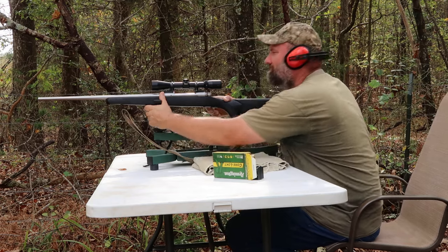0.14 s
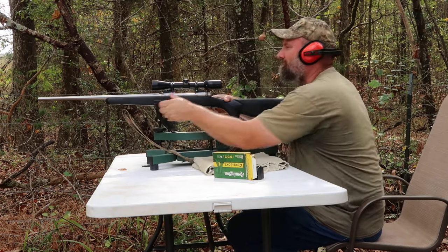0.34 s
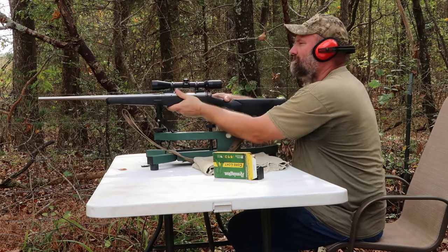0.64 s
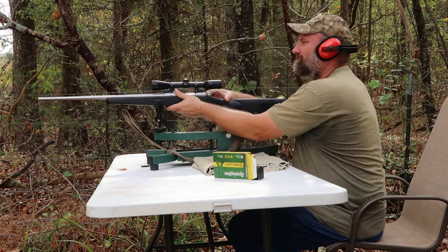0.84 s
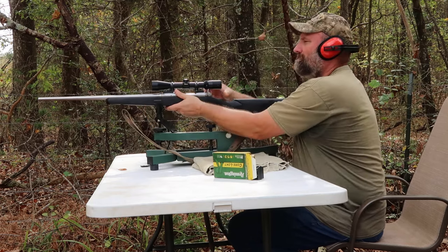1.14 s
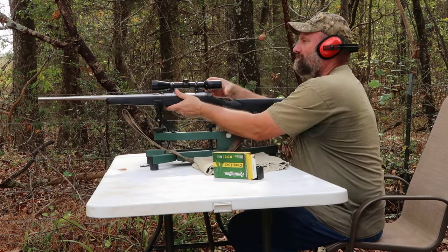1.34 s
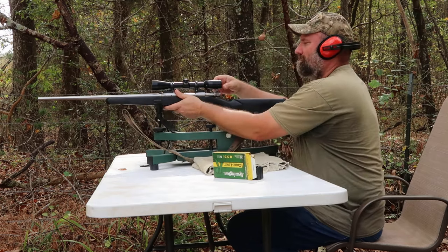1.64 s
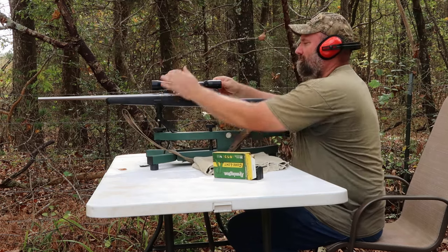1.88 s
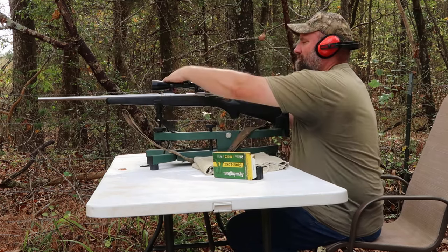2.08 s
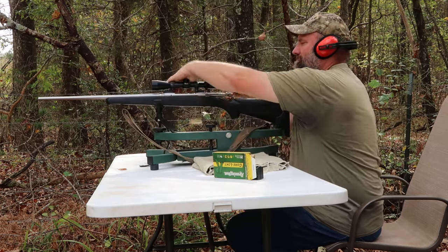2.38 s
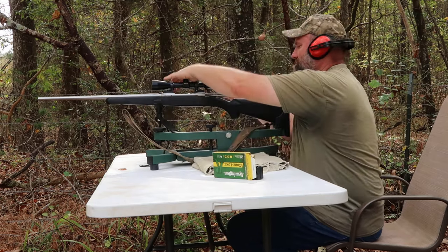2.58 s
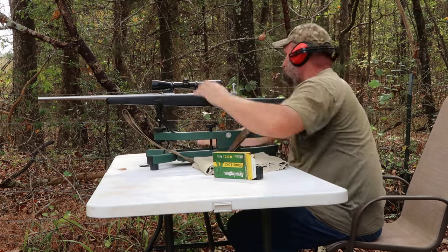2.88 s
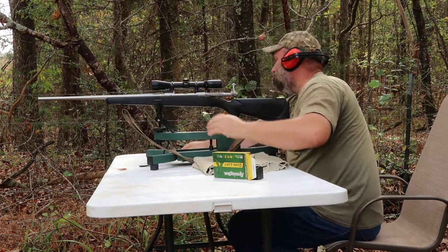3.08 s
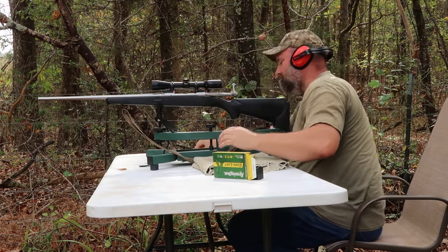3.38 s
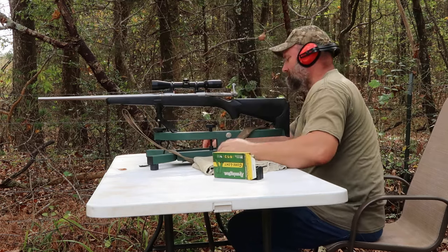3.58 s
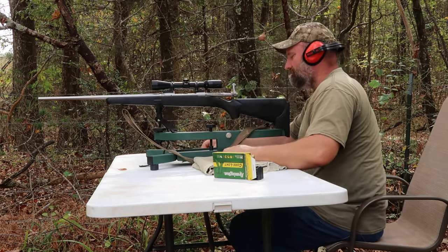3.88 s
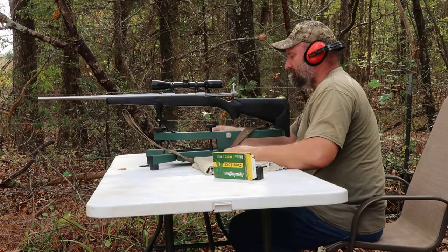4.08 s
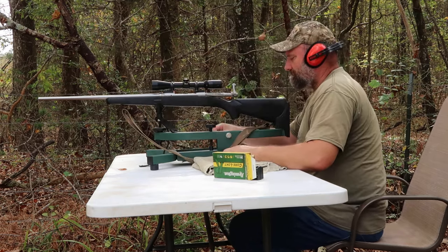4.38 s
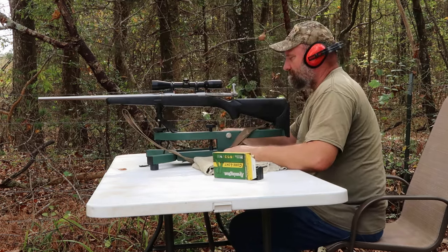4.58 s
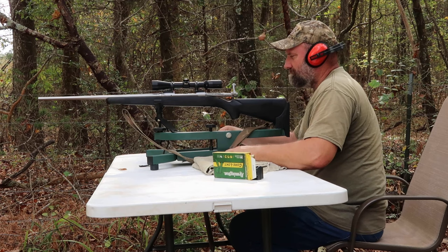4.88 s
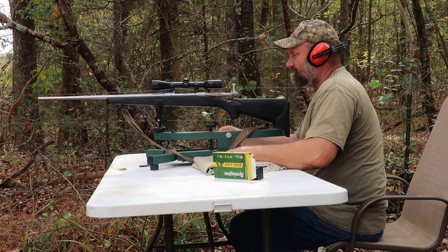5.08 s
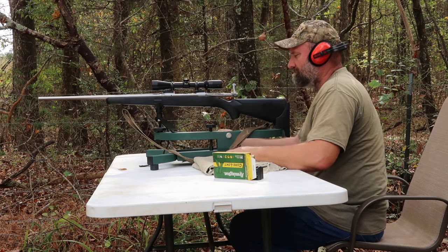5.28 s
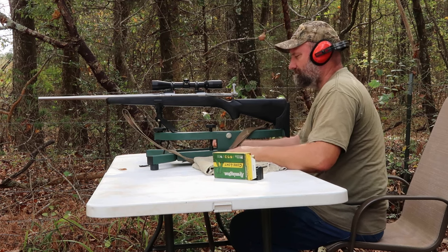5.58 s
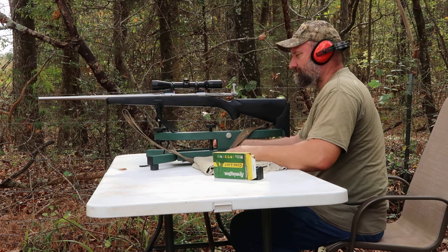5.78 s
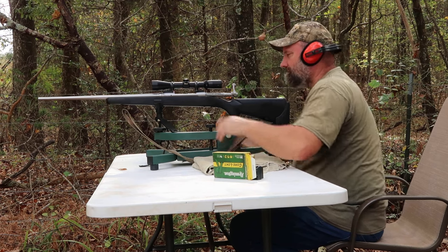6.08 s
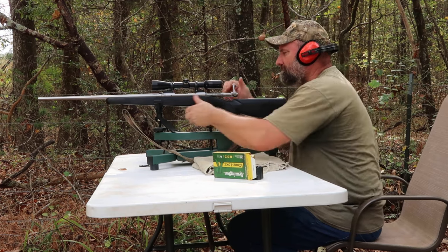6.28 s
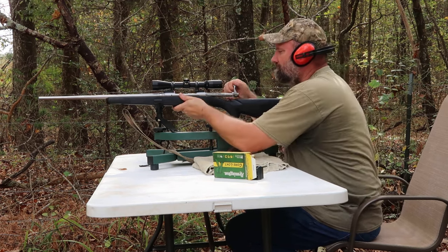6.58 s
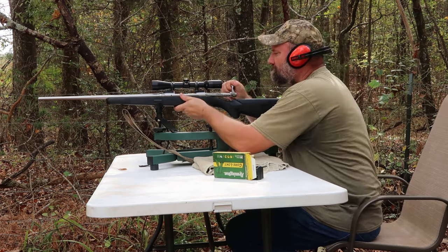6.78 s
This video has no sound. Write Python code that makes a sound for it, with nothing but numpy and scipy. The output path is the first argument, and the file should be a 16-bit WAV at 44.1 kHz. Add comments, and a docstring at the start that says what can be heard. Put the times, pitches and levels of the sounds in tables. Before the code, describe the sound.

Sharp metallic bolt clacks, a hollow double knock and scuffing of a gunstock, then a small brass clatter on plastic, over softly rushing leaves.

```python
"""A rifle bolt is lifted and drawn back at a plastic shooting table in quiet woods, freeing a brass case.
The stock clacks down into a steel rest, rocks and slides; the case drops on the table; the bolt is touched again.
Blows are noise cracks plus decaying modes; rubbing is uneven noise in strokes.
The trees scatter every sound back, over a soft rush of leaves in shaped noise."""
import sys
import numpy as np
from scipy import signal
from scipy.fft import rfft, irfft, next_fast_len
from scipy.io import wavfile
from scipy.ndimage import map_coordinates

SR = 44100
rng = np.random.default_rng(int(sys.argv[2]) if len(sys.argv) > 2 else 0)


def transcribe(signal):
    """Save signal, clipped to [-1, 1], as a 16-bit WAV file at the path in sys.argv[1]."""
    frames = np.atleast_2d(signal).T
    limited = np.clip(frames, -1, 1)
    pcm = np.round(limited * 32767).astype(np.int16)
    wavfile.write(sys.argv[1], SR, pcm)


N = 305777  # samples
RING_TIME_S = np.arange(SR // 4) / SR

# Bolt clicks. Each row: start in seconds, strength in dB, hardness in dB (tilts towards treble),
# note of the struck part in Hz, lift of that note in dB.
BOLT_CLICKS = [(0.786, -40.5, -8.5, 1490, 12), (1.206, -41.5, 4, 2140, 2), (1.218, -43.5, 9, 2410, 0),
               (1.2285, -32, -6, 1170, 14), (1.234, -26.5, 6, 1910, 12.5), (1.330, -48, -26, 1400, 2),
               (1.414, -52, 1, 3100, 4), (1.434, -43, -10, 1830, 7), (1.565, -50, -8, 1720, 9),
               (1.594, -46.5, -11, 1520, 11), (1.691, -51.5, -20, 3470, 9), (2.114, -52, -9, 876, 18),
               (2.124, -46.5, -3, 2480, 18), (2.135, -46.5, -14, 870, 19), (2.1475, -32.5, 7, 2400, 11.5),
               (2.153, -37.5, 8.5, 860, 20), (2.2555, -38.5, 14, 2270, 24.5), (2.297, -46, -3, 2350, 8),
               (2.468, -40, 6, 2200, 15), (2.5025, -38, 5.5, 3900, 3), (2.514, -38.5, 5, 3230, -1),
               (2.535, -30.5, 9.5, 7400, -1), (3.633, -50.5, 1, 3030, 3), (6.550, -51, 11, 4500, -3),
               (6.852, -41.5, 11, 5000, 20), (6.925, -41.5, -6, 2180, 8)]
# Modes of the steel action. Each row: frequency in Hz, relative level in dB, t60 in seconds.
ACTION_MODES = [(444.6, -1, 0.13), (1130, -8, 0.05), (1920, 6, 0.05), (2250, 4, 0.09), (3400, -7, 0.045)]
# Crack colour of the steel action. Each row: frequency in Hz, relative level in dB.
STEEL_TONE = [(60, -27), (220, -7), (450, 4.5), (1200, 10.5), (3000, 12), (5000, 1), (8500, -7.5),
              (12000, -12), (16000, -28)]
# Short strokes of the bolt in its raceway. Each row: start in seconds, length in seconds, level in dB.
BOLT_DRAWS = [(1.264, 0.024, -56), (1.322, 0.022, -57), (1.416, 0.034, -51), (2.114, 0.029, -58),
              (2.143, 0.034, -48), (2.215, 0.012, -56)]

# Stock knocking on the rest. Each row: start in seconds, strength in dB, weight behind it in dB (adds thump),
# note of the struck part in Hz, lift of that note in dB.
STOCK_KNOCKS = [(2.5335, -20.5, -1.5, 780, 7), (2.536, -23, -6, 2750, 14), (2.5485, -17.5, -5.5, 1470, 7),
                (2.551, -27.5, -3, 790, 18), (2.562, -36, 7.5, 417, 17), (2.746, -28.5, 0.5, 580, 11),
                (2.754, -41, 10, 290, 13), (2.766, -23, -18, 1630, 4.5), (2.806, -33.5, -6, 2120, 13),
                (2.876, -34.5, 1, 450, 28), (2.8975, -29, -2, 440, 19), (2.91, -34.5, -8, 433, 18),
                (2.949, -42.5, 8.5, 457, 26), (2.963, -33, -9, 440, 27), (3.068, -43, 11.5, 180, 24),
                (3.078, -42, -16, 420, 12), (3.209, -50, -1, 660, 8)]
# Modes of the hollow rest. Each row: frequency in Hz, relative level in dB, t60 in seconds.
REST_MODES = [(282, -5.5, 0.22), (325, -12, 0.12), (412, -9, 0.12), (462, 7.5, 0.065), (517, -17, 0.11),
              (703, -15, 0.11), (817, -1, 0.083), (863, 0, 0.066), (1526, -4, 0.062), (1800, -19, 0.075),
              (1930, -20, 0.095), (2360, 1, 0.049)]
# Crack colour of the rest. Each row: frequency in Hz, relative level in dB.
REST_TONE = [(45, -55), (65, -36), (100, -11), (210, 2), (400, 4.5), (800, 5), (1200, -0.5), (3000, -3),
             (4500, -11.5), (8000, -17), (15000, -29)]
# Stock's weight reaching the table top through the rest. Each row: start in seconds, level in dB.
TABLE_THUMPS = [(1.234, -53), (1.325, -53), (2.548, -26), (2.747, -32.5)]
# Low modes of the table top. Each row: frequency in Hz, relative level in dB, t60 in seconds.
BOARD_MODES = [(291, 6, 0.091), (317, -5.5, 0.16), (413, 1.5, 0.085), (517, -1, 0.18), (677, -8, 0.18)]
# Shoves of the stock in its cradle. Each row: start in seconds, length in seconds, groan in dB, scuff in dB.
STOCK_SHOVES = [(2.88, 0.12, -42, -49), (3.017, 0.11, -44.5, -52), (3.179, 0.17, -47.5, -52),
                (3.342, 0.042, -54, -53), (3.468, 0.025, -46.5, -45)]
# Cradle resonances. Each row: frequency in Hz, width in Hz (before squaring), relative level in dB.
CRADLE_RESONANCES = [(441, 170, 5), (830, 460, -3.5)]
# Scuff colour. Each row: frequency in Hz, relative level in dB.
SCUFF_TONE = [(150, -37), (900, -5), (1500, 6.5), (3200, 1), (5000, -10.5), (10000, -26.5)]

# Case bouncing on its rim (hard) or side. Each row: start in seconds, strength in dB, hardness in dB.
CASE_BOUNCES = [(4.558, -30.5, -6), (4.562, -29, 0), (4.571, -21.5, 2.5), (4.578, -29, -0.5),
                (4.591, -36.5, -7), (4.603, -52, 1), (4.621, -40, -6), (4.644, -39.5, -6)]
# Modes of the table under the case. Each row: frequency in Hz, relative level in dB, t60 in seconds.
TABLE_MODES = [(960, 2, .07), (1335, -7, .17), (1766, -5, .06), (2412, 1, .07), (2690, -1, .08),
               (2985, 0, .1), (3142, -3, .12), (3707, -4, .11), (5771, -9, .12), (6939, -11, .09)]
# Crack colour of the table. Each row: frequency in Hz, relative level in dB.
TABLE_TONE = [(60, -51), (250, -10.5), (700, -13), (1000, 2), (1900, 3), (3000, 10), (4600, -3.5),
              (7500, -6.5), (15000, -28)]
# Thin brass wall set ringing. Each row: start in seconds, note in Hz, note level in dB, overtone level in dB.
BRASS_PINGS = [(2.146, 10230, -39.5, -46), (2.257, 9780, -48.5, -65), (2.297, 9830, -52, -70),
               (2.536, 10060, -44, -62), (2.769, 9930, -51.5, -64), (2.901, 9850, -55, -67),
               (4.557, 9700, -40, -50), (4.57, 9840, -31.5, -56), (4.617, 9760, -41, -71),
               (4.678, 9860, -56, -80)]

# Sleeve brushing as the arm moves. Each row: start in seconds, length in seconds, level in dB.
SLEEVE_RUSTLES = [(0.425, 0.31, -65), (6.285, 0.03, -55.5), (6.44, 0.2, -60), (6.738, 0.21, -58.5)]
# Cloth colour. Each row: frequency in Hz, relative level in dB.
CLOTH_TONE = [(150, -9), (500, 4.5), (1400, -3.5), (3200, -3), (8000, -15), (15000, -29)]

# Decay of the trunks' echo. Each row: frequency in Hz, t60 in seconds.
WOODS_T60 = [(150, 0.75), (600, 0.98), (2500, 0.57), (6000, 0.51), (13000, 0.19)]
# Colour of what the trunks send back. Each row: frequency in Hz, relative level in dB.
TRUNK_TONE = [(100, -3), (400, -21), (2000, -1), (5000, -1.5), (14000, 10.5)]
# Colour of the distant leaves. Each row: frequency in Hz, relative level in dB.
LEAVES_TONE = [(20, -12), (77, -8.5), (262, -1), (410, 0.5), (660, -1), (1370, -6), (2670, -7.5),
               (6000, -16), (10800, -23.5), (13000, -31.5), (15500, -43)]
# Gain of the side signal for handling, straight ahead. Each row: frequency in Hz, gain in dB.
HANDLING_WIDTH = [(100, -48), (400, -72), (1400, -77), (2800, -26), (5500, -13), (11000, 1)]
# Gain of the side signal for the echoes. Each row: frequency in Hz, gain in dB.
ECHO_WIDTH = [(100, -29), (300, -58), (700, -59), (1400, -41), (2800, -13.5), (5500, 0.5)]
# Gain of the side signal for the leaves, from all around. Each row: frequency in Hz, gain in dB.
LEAVES_WIDTH = [(60, -21), (200, -33), (700, -19), (1300, -8.5), (2400, -7), (5000, 2)]

DRAW_ATTACK_S, DRAW_T60_S = 0.0037, 0.065
SHOVE_ATTACK_SHARE, SHOVE_T60_S = 0.6, 0.2  # attack as a share of the shove's length
SLIP_KNOTS_PER_S, SLIP_UNEVEN_DB, GRIT_DB = 70, 3.5, 1.5  # dB per unit of random curve
OVERTONE_HZ = 14720  # second mode of the brass wall, before detuning
SLACK_S, RATTLE_DB, RATTLE_SPREAD_DB = .006, -4, 1.5  # mean wait, change per touch, scatter
AIR_DB, AIR_START_DB, AIR_SETTLE_S = -56, -2.5, 0.89  # settled level, initial offset, time constant
TOP_HZ = 15750


def amp(db):
    """Decibels to gain."""
    return 10 ** (np.asarray(db) / 20)


def unit(x):
    """Scale to rms 1."""
    return x / np.sqrt(np.mean(x ** 2) + 1e-20)


def along(points, hz):
    """Interpolate (Hz, value) points on a log axis."""
    point_hz, value = np.transpose(points)
    return np.interp(np.log(hz + 1), np.log(point_hz + 1), value)


def wobble(knots_per_s):
    """Smooth random curve through normal knots."""
    knots = rng.standard_normal(int(N * knots_per_s / SR) + 4)
    return map_coordinates(knots, [np.arange(N) * knots_per_s / SR])


def filtered(x, response):
    """Apply a response of frequency, zero-padded."""
    n = x.shape[-1]
    m = next_fast_len(n + 8192)
    return irfft(rfft(x, m) * response(np.fft.rfftfreq(m, 1 / SR)), m)[..., :n]


def toned(x, tone):
    """Apply a (Hz, dB) colour."""
    return filtered(x, lambda hz: amp(along(tone, hz)))


def noise(tone, size):
    """Coloured noise of rms 1."""
    return unit(toned(rng.standard_normal(size), tone))


def add(track, start_s, sound):
    """Mix a sound into the track, cut at its end."""
    part = track[..., round(start_s * SR):][..., :sound.shape[-1]]
    part += sound[..., :part.shape[-1]]


def stereo(pair, width):
    """Mid and side to left and right; width sets the side gain by frequency."""
    side = toned(pair[1], width)
    return np.array([pair[0] + side, pair[0] - side])


def resonance(f, hz, width_hz):
    """Causal response of one damped mode, 1 at its centre."""
    return 1j * f * width_hz / (hz * hz - f * f + 1j * f * width_hz)


def ring(modes, scatter_db, detune):
    """Decaying modes, mid and side; strengths and pitches vary from blow to blow."""
    hz, db, t60_s = np.transpose(modes)[:, :, None]
    hz = hz * (1 + detune * rng.standard_normal(hz.shape))
    strength = amp(db.T + scatter_db * rng.standard_normal((2, len(modes))))
    strength = strength * rng.choice([-1, 1], len(modes))
    swing = np.exp((2j * np.pi * hz - np.log(1000) / t60_s) * RING_TIME_S)
    return np.array([strength[0] @ swing.imag, strength[1] @ swing.real])


def contacts(rows, modes, tone, ring_db, rise_s, hold_s, t60s_s, balance_db, touch_slopes, detune,
             part_width=.1):
    """Blows: a dense crack, held while the faces grind, plus body modes; touch (hardness or weight) tilts bands."""
    track, t = np.zeros((2, N)), RING_TIME_S
    edges = [((105, 900), "band"), ((900, 4500), "band"), (4500, "high")]  # low, middle, high in Hz
    bands = [signal.butter(3, edge, kind, fs=SR, output="sos") for edge, kind in edges]
    onset = 1 - np.exp(-t / rise_s)
    for start_s, strength_db, touch_db, *part in rows:
        dense = noise(tone, size=(2, len(t)))
        modal = amp(ring_db) * ring(modes, scatter_db=2.5, detune=detune)
        if part:  # the struck part's note colours the crack
            hz, lift_db = part
            dense = unit(filtered(dense, lambda f: 1 + amp(lift_db) * resonance(f, hz, part_width * hz)))
        for band, band_db, slope, t60_s in zip(bands, balance_db, touch_slopes, t60s_s):
            crack = dense * amp(-60 * np.maximum(t - hold_s, 0) / t60_s)
            blow = signal.sosfilt(band, (crack + modal) * onset)
            blow = blow / np.std(blow[0, :SR // 100])  # level set on the first 10 ms of mid
            add(track, start_s, amp(strength_db + band_db + slope * touch_db) * blow)
    return track


def stroke(start_s, length_s, attack_s, t60_s):
    """Gain of one rubbing stroke: attack, hold, release."""
    t = np.arange(N) / SR - start_s
    return np.clip(t / attack_s, 0, 1) * amp(-60 * np.clip((t - length_s) / t60_s, 0, 2))


def slips(knots_per_s, uneven_db):
    """Friction: noise that catches and lets go."""
    return rng.standard_normal((2, N)) * amp(uneven_db * wobble(knots_per_s))


def bolt():
    """Lugs, cam and bolt stop click in the steel action; hardness adds treble and cuts bass."""
    return contacts(BOLT_CLICKS, ACTION_MODES, STEEL_TONE, ring_db=-25, rise_s=0.00088, hold_s=0.0037,
                    t60s_s=[.032, .016, .014], balance_db=[-9, 0, -8.5], touch_slopes=[-0.34, 0, 0.8],
                    detune=0.016, part_width=0.085)


def scrape():
    """Steel grates on steel between the clicks: steel-coloured noise in short strokes."""
    gain = sum(amp(db) * stroke(start_s, length_s, DRAW_ATTACK_S, DRAW_T60_S)
               for start_s, length_s, db in BOLT_DRAWS)
    return gain * unit(toned(slips(knots_per_s=200, uneven_db=0.0), STEEL_TONE))


def rest():
    """The stock lands in the hollow rest and rocks; weight mostly adds bass."""
    return contacts(STOCK_KNOCKS, REST_MODES, REST_TONE, ring_db=-12.5, rise_s=0.00074, hold_s=0.004,
                    t60s_s=[.065, .042, .028], balance_db=[-1, -0.5, -21], touch_slopes=[0.9, 0, 0.11],
                    detune=0.01, part_width=0.076)


def table_top():
    """Low modes of the table top boom briefly under the stock's weight."""
    track = np.zeros((2, N))
    onset = 1 - np.exp(-RING_TIME_S / 0.0012)
    for start_s, db in TABLE_THUMPS:
        add(track, start_s, amp(db) * ring(BOARD_MODES, scatter_db=1.0, detune=0.0033) * onset)
    return track


def slide():
    """Slips of the stock make the cradle resonances groan, under a dry, gritty scuff."""
    rub = slips(SLIP_KNOTS_PER_S, SLIP_UNEVEN_DB)
    groan = unit(filtered(rub, lambda f: sum(amp(db) * resonance(f, hz, width_hz) ** 2
                                             for hz, width_hz, db in CRADLE_RESONANCES)))
    scuff = unit(toned(rub * amp(GRIT_DB * wobble(420)), SCUFF_TONE))
    track = np.zeros((2, N))
    for start_s, length_s, groan_db, scuff_db in STOCK_SHOVES:
        gain = stroke(start_s, length_s, SHOVE_ATTACK_SHARE * length_s, SHOVE_T60_S)
        track += gain * (amp(groan_db) * groan + amp(scuff_db) * scuff)
    return track


def case_bounces():
    """The empty case clatters on the table; hardness adds treble and cuts bass."""
    return contacts(CASE_BOUNCES, TABLE_MODES, TABLE_TONE, ring_db=-10, rise_s=0.00085, hold_s=0.0016,
                    t60s_s=[.05, .036, .03], balance_db=[-12.5, -1, -9.5], touch_slopes=[-0.81, 0, 1],
                    detune=0.004)


def case_pings():
    """Two modes of the brass wall ring at each ping, then at three weaker touches as the loose case chatters."""
    track = np.zeros((2, N))
    onset = 1 - np.exp(-RING_TIME_S / 0.00045)
    for start_s, hz, note_db, overtone_db in BRASS_PINGS:
        modes = [(hz, note_db, .1), (OVERTONE_HZ, overtone_db, .07)]
        touches_s = start_s + np.cumsum([0, *rng.exponential(SLACK_S, size=3)])
        for k, touch_s in enumerate(touches_s):
            brass = ring(modes, scatter_db=RATTLE_SPREAD_DB, detune=0.0038)
            add(track, touch_s, amp(k * RATTLE_DB) * brass * onset)
    return track


def sleeve():
    """Cloth rustles faintly as the arm moves: uneven friction noise in strokes."""
    gain = sum(amp(db) * stroke(start_s, length_s, attack_s=0.0096, t60_s=0.22)
               for start_s, length_s, db in SLEEVE_RUSTLES)
    return gain * unit(toned(slips(knots_per_s=72, uneven_db=5.0), CLOTH_TONE))


def woods(direct, near_db, near_t60_s, far_db):
    """Table and ground answer after 4 ms; the trunks add a longer tail. Gives mid and side."""
    hz, frame_s, z = signal.stft(rng.standard_normal((2, SR)), SR, nperseg=256)
    tail_db = along(TRUNK_TONE, hz)[:, None] - 60 * frame_s / along(WOODS_T60, hz)[:, None]
    far = signal.istft(z * amp(tail_db), SR, nperseg=256)[1][:, :SR]
    t = np.arange(SR) / SR
    far = far * (1 - np.exp(-t / 0.0059))
    near = rng.standard_normal((2, SR)) * amp(-60 * t / near_t60_s) * (t > .004)
    answer = amp(near_db) * near / np.linalg.norm(near[0]) + amp(far_db) * far / np.linalg.norm(far[0])
    return signal.fftconvolve(direct[None], answer, axes=1)[:, :N]


def air():
    """A soft rush of distant leaves: shaped noise, slightly lower at first, gently wavering."""
    level_db = AIR_DB + AIR_START_DB * np.exp(-np.arange(N) / SR / AIR_SETTLE_S)
    waver_db = 0.52 * wobble(3.54) + 0.22 * wobble(21)
    return amp(level_db + waver_db) * stereo(noise(LEAVES_TONE, size=(2, N)), LEAVES_WIDTH)


def scene():
    """Handling straight ahead; its mid and side each return as echoes, over the leaves."""
    handling = bolt() + scrape() + rest() + table_top() + slide() + case_bounces() + case_pings() + sleeve()
    echoes = sum(woods(thrown, near_db=-12.5, near_t60_s=0.12, far_db=-13) for thrown in handling)
    return stereo(handling, HANDLING_WIDTH) + stereo(echoes, ECHO_WIDTH) + air()


def record(dry):
    """Cut everything from the band limit up."""
    return filtered(dry, lambda hz: hz < TOP_HZ)


dry = scene()
out = record(dry)
transcribe(out)
```